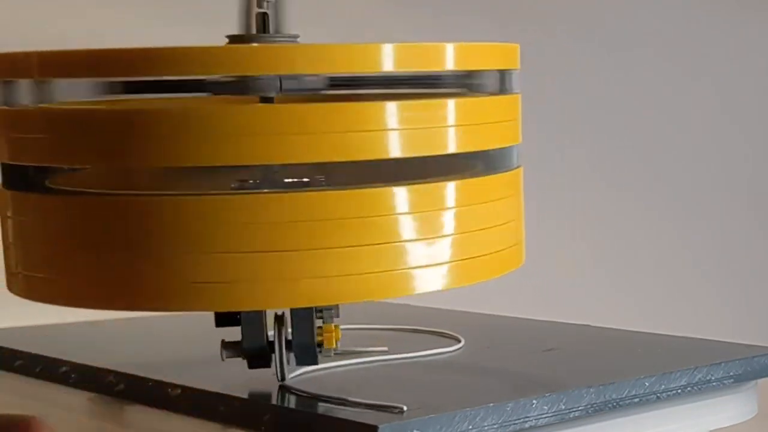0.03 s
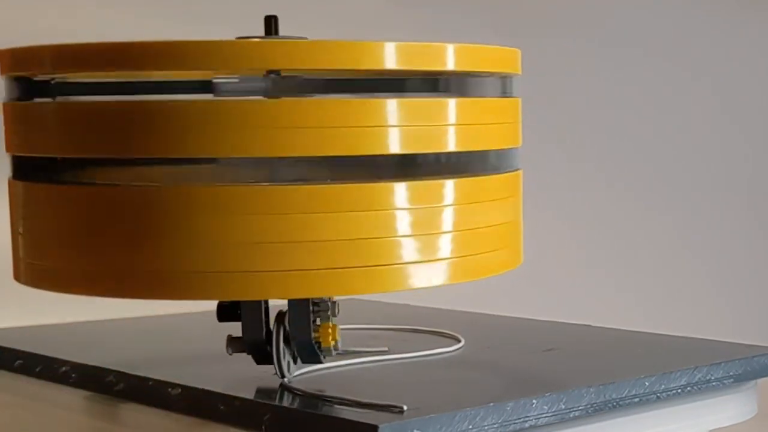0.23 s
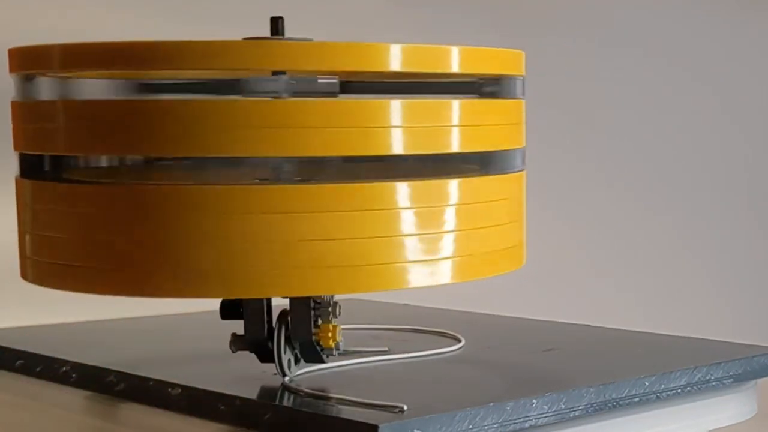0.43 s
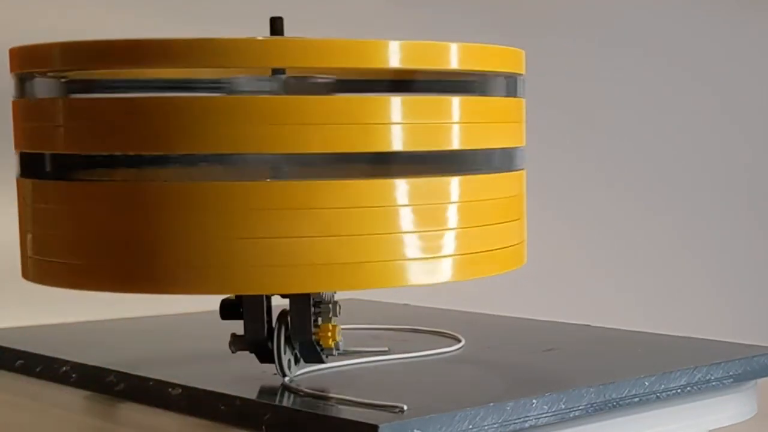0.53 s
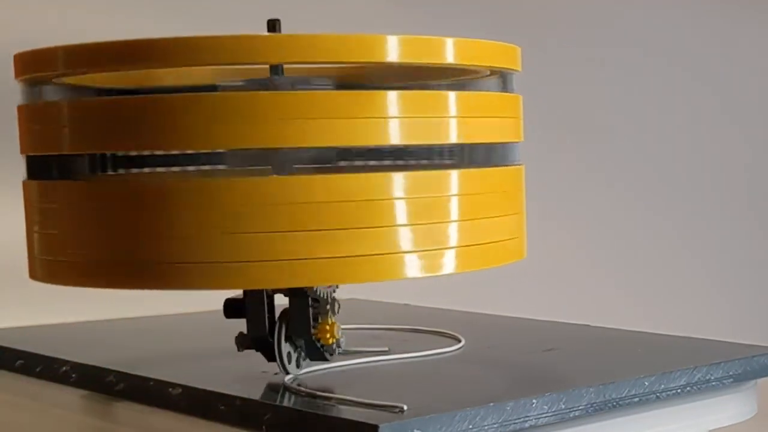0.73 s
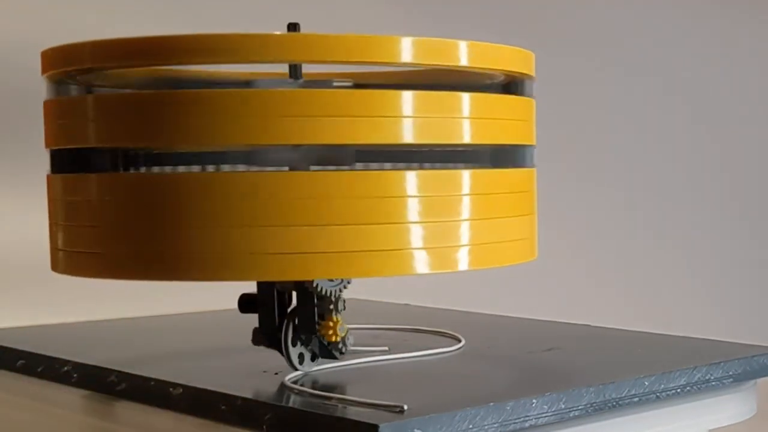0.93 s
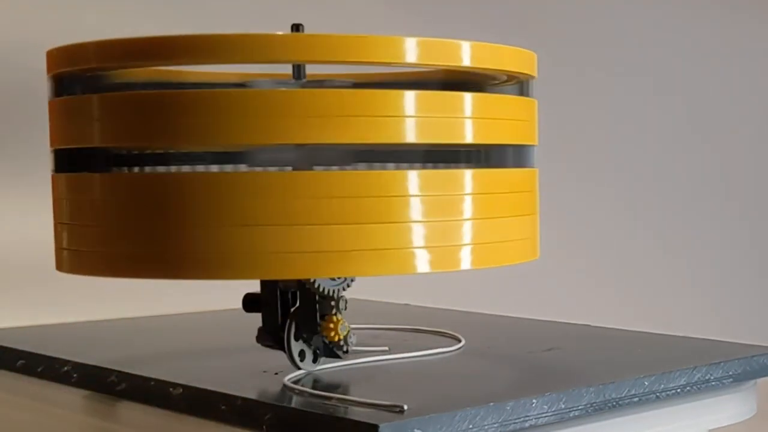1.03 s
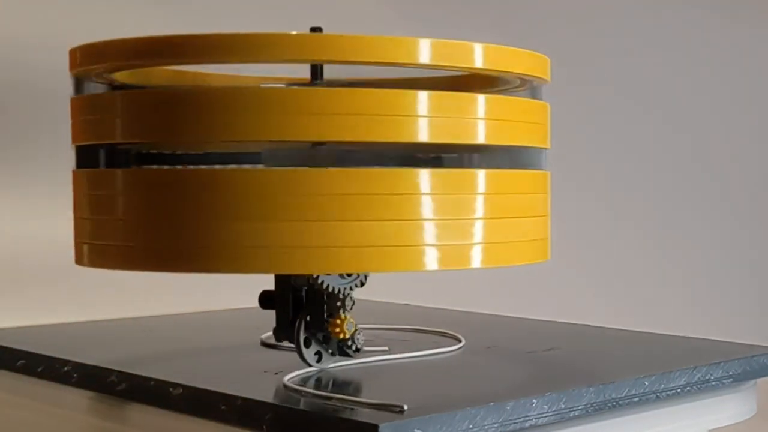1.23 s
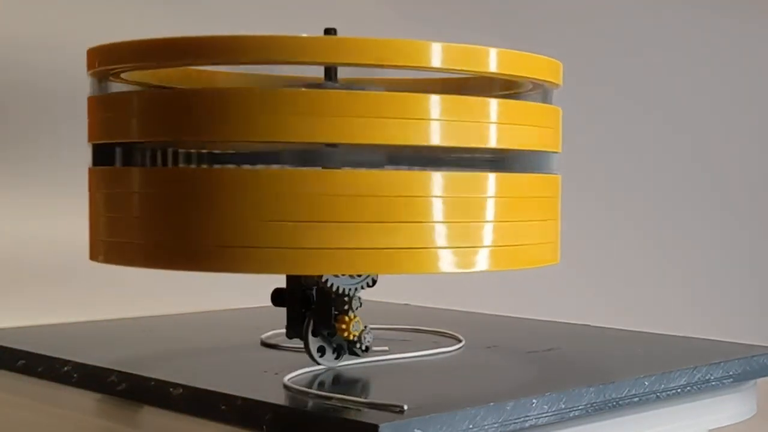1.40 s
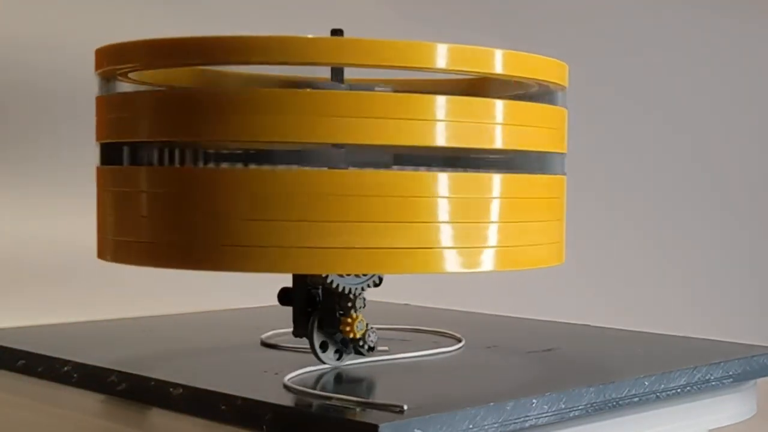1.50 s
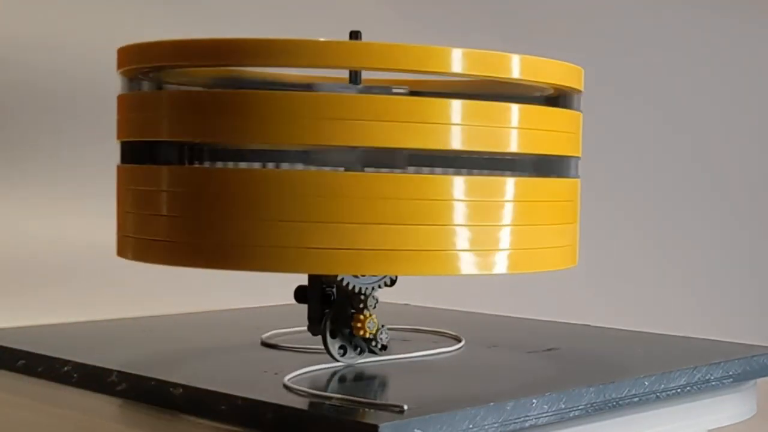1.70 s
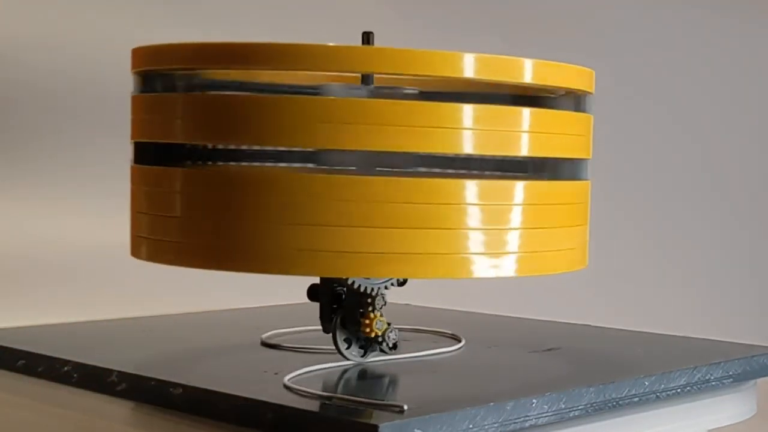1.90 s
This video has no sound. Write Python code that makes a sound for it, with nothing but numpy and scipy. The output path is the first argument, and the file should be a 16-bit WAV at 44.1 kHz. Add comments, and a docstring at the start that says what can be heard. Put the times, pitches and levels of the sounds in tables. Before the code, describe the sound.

Noisy geared whirring of a spinning toy starts abruptly with plastic clacks, rattles along, and fades out

```python
"""Small room, close pair of microphones: a toy gyroscope a little to the left runs on a board.
It hums on its spindle (wavering sines), is let go with a plastic clack (short noise bursts) and runs on its geared foot.
The gear teeth chatter (random impacts ringing the frame), catch in short rattles and run down.
The foot scrapes (sinking noise band) and bumps the board (decaying sines and thuds); the flywheel rumbles."""
import sys
import numpy as np
from scipy import signal
from scipy.fft import rfft, irfft
from scipy.io import wavfile
from scipy.ndimage import map_coordinates

SR = 44100
rng = np.random.default_rng(int(sys.argv[2]) if len(sys.argv) > 2 else 0)


def wav_record(signal):
    """Record a signal, one row per channel, as 16-bit PCM in the file named by sys.argv[1]."""
    frames = np.transpose(np.atleast_2d(signal))
    bounded = np.clip(frames, -1, 1)
    # unit amplitude maps onto the largest positive 16-bit level
    quanta = np.round(bounded * 32767).astype(np.int16)
    wavfile.write(sys.argv[1], SR, quanta)


N = 85995
TIME_S = np.arange(N) / SR
# Table levels are relative to the mix in scene().


def amp(db):
    """Decibels to gain."""
    return 10 ** (np.asarray(db) / 20)


def evened(x):
    """Scales to an rms of 1."""
    return x / np.sqrt(np.mean(x ** 2) + 1e-20)


def unit(x):
    """Scales to an energy of 1."""
    return x / np.sqrt(np.sum(x ** 2) + 1e-20)


def curve(rows):
    """Columns of a time table, interpolated to one value per sample."""
    knot_s, *columns = np.transpose(rows)
    return [np.interp(TIME_S, knot_s, column) for column in columns]


def read(points, freq_hz):
    """Spectrum table interpolated on a log-frequency axis."""
    knot_hz, value = np.transpose(points)
    return np.interp(np.log(freq_hz + 1), np.log(knot_hz + 1), value)


def add(mix, start_s, sound):
    """Mixes a sound in at a time."""
    part = mix[max(round(start_s * SR), 0):][:len(sound)]
    part += sound[:len(part)]


def through(x, response):
    """Convolves and keeps the length."""
    return signal.fftconvolve(x, response)[:len(x)]


def colour(points, size=4096):
    """Causal (minimum-phase) response with the given spectrum."""
    freq_hz = abs(np.fft.fftfreq(size, 1 / SR))
    log_gain = np.log(amp(read(points, freq_hz)))
    spectrum = np.exp(np.conj(signal.hilbert(log_gain)))
    return np.fft.ifft(spectrum).real[:size // 2]


def ring(modes, size=12000):
    """Struck object: a sum of exponentially dying sines, scaled to unit energy."""
    t_s = np.arange(size) / SR
    partials = (amp(level_db) * 1000 ** (-t_s / t60_s) * np.sin(2 * np.pi * pitch_hz * t_s)
                for pitch_hz, level_db, t60_s in modes)
    return unit(sum(partials))


def drift(rate_hz):
    """Slow random curve of rms 1: noise rolled off above a rate."""
    rolloff = 1 + (np.fft.rfftfreq(N, 1 / SR) / rate_hz) ** 4
    return evened(irfft(rfft(rng.standard_normal(N)) / rolloff, N))


def ticks(per_s, spread_db):
    """Random impacts of uneven size and either sign, rms 1."""
    size = amp(spread_db * np.minimum(rng.exponential(1, N), 3.5))
    sign = rng.choice([-1, 1], N)
    return evened(size * sign * (rng.random(N) < per_s / SR))


def resonate(x, centre_hz, width_hz):
    """Resonance that follows a frequency curve: shift to zero, lowpass, shift back."""
    turn = np.exp(2j * np.pi * np.cumsum(centre_hz) / SR)
    pole = np.exp(-np.pi * width_hz / SR)
    return 2 * (turn * signal.lfilter([1 - pole], [1, -pole], x / turn)).real


def scatter(t60_s, size=6000):
    """Dense, quickly dying cluster of contacts or echoes, unit energy."""
    return unit(rng.standard_normal(size) * 1000 ** (-np.arange(size) / SR / t60_s))


def turning(x, responses, swap_hz):
    """Crossfades round a cycle of responses, because the toy keeps turning."""
    count = len(responses)
    away = (TIME_S * swap_hz - np.arange(count)[:, None] + 1) % count - 1  # swaps from each response's peak
    gains = np.cos(np.pi / 2 * np.clip(away, -1, 1))
    return sum(through(x * gain, response) for gain, response in zip(gains, responses))


# air of the room: freq_hz, density_db_per_hz
FLOOR_COLOUR = [(20, -25), (32, -29), (48, 1.5), (110, -13), (220, -3), (450, -6), (900, -19), (1600, -9.5),
                (4000, -45), (8000, -29), (16000, -53)]
FLOOR_DB = -59


def room_tone(apart=0.51):
    """Quiet air of the room: coloured noise, partly shared by both microphones."""
    shared, left, right = (through(noise, colour(FLOOR_COLOUR)) for noise in rng.standard_normal((3, N)))
    return amp(FLOOR_DB) * evened(shared + apart * np.array([left, right]))


# hum of the held wheel: pitch_hz, level_db
HUM_TONES = [(89, -55.5), (244, -51.5), (522, -59)]
HUM_END_S, HUM_FADE_S = 0.31, 0.13  # the fade starts at the end time


def hum(flutter_db=1.5, whine_hz=1550, whine_width_hz=70, whine_db=-63):
    """Wheel on its spindle: wavering sines and a faint whine until shortly after it is let go."""
    held = np.clip(1 - (TIME_S - HUM_END_S) / HUM_FADE_S, 0, 1)
    warped_s = np.cumsum(1 + .005 * drift(rate_hz=14)) / SR  # pitch wavers by 0.5 % rms
    whine = evened(resonate(rng.standard_normal(N), np.full(N, whine_hz), whine_width_hz))
    tones = sum(amp(level_db + flutter_db * drift(rate_hz=28)) * np.sin(2 * np.pi * pitch_hz * warped_s)
                for pitch_hz, level_db in HUM_TONES)
    return held * (tones + amp(whine_db) * whine)


# modes of the plastic frame: pitch_hz, level_db, t60_s
FRAME_MODES = [(2460, -17.5, 0.023), (3215, -0.5, 0.009), (5170, 1, 0.014), (7086, 0, 0.021),
               (9130, -3.5, 0.017), (11140, -1.5, 0.012), (12900, -1, 0.0059), (15100, -8, 0.0062)]


def frame(x, count=12):
    """Plastic frame: its modes ring at slightly different pitches as the toy turns."""
    shifts = 1 + .012 * rng.standard_normal((count, len(FRAME_MODES)))
    rings = []
    for row in shifts:
        modes = [(pitch_hz * k, level_db, t60_s) for (pitch_hz, level_db, t60_s), k in zip(FRAME_MODES, row)]
        rings.append(ring(modes, size=2000))
    return turning(x, rings, swap_hz=69.5)


# gear chatter: time_s, whirr_db, teeth_db
GEAR_LEVELS = [(0, -56, -52.5), (.216, -56, -56), (.236, -37, -34), (.29, -40, -36.5), (.33, -39.5, -39),
               (.41, -40.5, -36.5), (.52, -41.5, -43.5), (.66, -41.5, -40.5), (.8, -40.5, -39.5),
               (.93, -41.5, -39.5), (1.02, -41, -35), (1.1, -41.5, -37.5), (1.21, -40.5, -40),
               (1.46, -44.5, -43), (1.515, -48, -47), (1.66, -49.5, -53), (1.8, -62, -62),
               (1.95, -64.5, -73)]
# whirr: freq_hz, density_db_per_hz
WHIRR_COLOUR = [(100, -35), (300, -9), (750, -12.5), (1400, -8.5), (2300, -5.5), (3200, -2), (4200, -9.5),
                (7000, -5.5), (16000, -59)]
# tooth ticks, also in rattles(): freq_hz, density_db_per_hz
TEETH_COLOUR = [(500, -46), (2000, -9), (3300, -6), (4500, -0.5), (6700, 1.5), (8000, -2), (10000, -3),
                (12000, -6), (16000, -9.5)]
# middle of the whirr, sinking as the gears slow: time_s, centre_hz
WHIRR_CENTRE = [(.5, 2400), (1.1, 2230), (1.5, 1760)]


def gears(flutter_db=1.0, flutter_hz=220, sink_db=-7, ring_db=-7, sharp_db=-6, dull_hz=7500, bright_db=-42):
    """Teeth strike thousands of times a second, a few sharply, and ring the frame; soft strikes are duller."""
    whirr_db, teeth_db = curve(GEAR_LEVELS)
    clumps = amp(flutter_db * drift(flutter_hz))
    mesh, rub, fine = (clumps * ticks(per_s=12000, spread_db=3) for _ in range(3))
    sinking = evened(resonate(rub, curve(WHIRR_CENTRE)[0], width_hz=670))
    whirr = evened(through(mesh, colour(WHIRR_COLOUR))) + amp(sink_db) * sinking
    strikes = fine + amp(sharp_db) * ticks(per_s=120, spread_db=1.0)
    struck = evened(through(strikes, colour(TEETH_COLOUR)))
    teeth = evened(struck + amp(ring_db) * evened(frame(rub)))
    dull = signal.filtfilt(*signal.butter(1, dull_hz, fs=SR), teeth)
    force = np.minimum(amp(.5 * (teeth_db - bright_db)), 1)  # 1 = full treble, at bright_db and above
    return amp(whirr_db) * evened(whirr) + amp(teeth_db) * (dull + force * (teeth - dull))


# flywheel rumble: time_s, level_db
SPIN_LEVEL = [(0, -51), (.2, -51), (.3, -49.5), (.42, -56.5), (.85, -56.5), (1.07, -55), (1.25, -64),
              (1.55, -60), (1.95, -64)]
# its spectrum: freq_hz, density_db_per_hz
SPIN_SPECTRUM = [(25, -20), (60, -27), (90, 3), (150, -1.5), (240, 7), (340, -4), (480, -8), (750, -10.5),
                 (1500, -13.5), (4000, -31)]


def flywheel():
    """Spinning wheel's bearing rumbles through the board: uneven impacts, coloured."""
    rumble = through(ticks(per_s=1500, spread_db=8.0), colour(SPIN_SPECTRUM))
    return amp(curve(SPIN_LEVEL)[0]) * evened(rumble)


# bumps on the board: start_s, thud_db, knock_db, knock_hz, ring_db
BUMP_EVENTS = [(.008, -24, -17.5, 132, -33), (0.268, -17, -14, 270, -26), (0.28, -17.5, -21, 235, -28),
               (0.299, -19, -16, 130, -30), (.497, -22, -24, 270, -18.5), (.682, -42, -14.5, 800, -40),
               (.691, -34, -18, 493, -28), (.714, -38, -20, 676, -33), (1.043, -38, -23, 288, -42),
               (1.636, -31, -15.5, 540, -30), (1.6447, -18.5, -16, 456, -16.5)]
# thud: freq_hz, density_db_per_hz
THUD_COLOUR = [(40, -34), (80, 6), (220, -14), (500, 4), (1200, 5.5), (3000, -16), (16000, -59)]
# modes of the knock: multiple_of_knock_hz, level_db, t60_s
KNOCK_MODES = [(1, 0.5, 0.019), (1.3, -6, 0.017), (2.5, -8, 0.016)]
# modes of the board: pitch_hz, level_db, t60_s
BOARD_MODES = [(467, -0.82, 0.28), (1378, 6, 0.19), (1270, -2, .13), (1200, -2, 0.017)]


def bumps():
    """Foot on board: a short woody knock, a dull noise thud and a faint ring of the board."""
    out = np.zeros(N)
    for start_s, thud_db, knock_db, knock_hz, ring_db in BUMP_EVENTS:
        knock = ring([(knock_hz * multiple, level_db, t60_s) for multiple, level_db, t60_s in KNOCK_MODES])
        thud = unit(through(scatter(t60_s=0.069), colour(THUD_COLOUR)))
        add(out, start_s, amp(knock_db) * knock)
        add(out, start_s, amp(thud_db) * thud)
        add(out, start_s, amp(ring_db) * ring(BOARD_MODES))
    return out


SCRAPE_S, SCRAPE_HZ, SCRAPE_SAG_HZ_PER_S = 0.22, 3374, 520
SCRAPE_DB, SCRAPE_FADE_DB_PER_S = -42.5, 18


def scrape(width_hz=720):
    """Landing foot scrapes in one noise band, which sinks and fades as the foot takes up the spin."""
    age_s = np.maximum(TIME_S - SCRAPE_S, 0)
    centre_hz = SCRAPE_HZ - SCRAPE_SAG_HZ_PER_S * age_s
    once = resonate(rng.standard_normal(N), centre_hz, width_hz)
    band = resonate(once, centre_hz, width_hz)
    return (age_s > 0) * amp(SCRAPE_DB - SCRAPE_FADE_DB_PER_S * age_s) * evened(band)


# clacks of release and landing, then dry clicks of running and settling: start_s, level_db
CLACK_EVENTS = [(.2277, -11.5), (.2333, -20), (.2367, -4), (.2380, 0), (.2395, -4), (0.2485, -11),
                (0.2575, -4), (.287, -8), (.463, -14), (.9893, -9), (1.0752, -18), (1.719, -37),
                (1.771, -44), (1.7923, -28)]
# their spectrum: freq_hz, level_db
CLACK_SPECTRUM = [(200, -11), (1200, -11), (2200, -13), (3400, 8), (4500, -1.5), (7000, 2), (11000, -3),
                  (16000, -11)]


def clacks(ring_db=-11):
    """Hard, dry blows of plastic on plastic: short noise bursts that also ring the frame."""
    drive = np.zeros(N)
    for start_s, level_db in CLACK_EVENTS:
        add(drive, start_s, amp(level_db) * scatter(t60_s=0.003))
    return through(drive, unit(colour(CLACK_SPECTRUM))) + amp(ring_db) * frame(drive)


# rattles where the teeth catch: start_s, length_s, level_db
RATTLE_EVENTS = [(0.341, 0.027, -9), (0.375, 0.0057, -12), (0.393, 0.0037, -11.5), (0.4446, 0.021, -8.5),
                 (0.492, 0.012, -10), (0.537, 0.011, -6.5), (0.5963, 0.002, -11), (0.637, 0.003, -13),
                 (0.685, 0.025, -8), (0.748, 0.0087, -13.5), (0.813, 0.011, -13), (0.876, 0.0048, -11),
                 (0.979, 0.0081, -10.5), (1.012, 0.012, -11.5), (1.066, 0.023, -4.5),
                 (1.096, 0.0027, -12.5), (1.111, 0.0042, -5.5), (1.3674, 0.0046, -13),
                 (1.451, 0.019, -11.5), (1.5565, 0.01, -25), (1.594, 0.0048, -23), (1.624, 0.0022, -26)]


def rattles(ring_db=-2.0, crack_db=-1, fade_db=-5, hard_hz=19000, softening=0.28):
    """A catching tooth buzzes against the frame and dies away; gentle catches are duller."""
    drive = np.zeros(N)
    contacts = ticks(per_s=7700, spread_db=-1.0)
    for start_s, length_s, level_db in RATTLE_EVENTS:
        buzz = contacts[round(start_s * SR):][:max(round(length_s * SR), 2)]
        buzz = unit(buzz * amp(np.linspace(0, fade_db, len(buzz))))
        top_hz = min(hard_hz * amp(softening * level_db), SR / 2 - 1)  # hard_hz holds at 0 dB
        add(drive, start_s, amp(level_db) * signal.lfilter(*signal.butter(2, top_hz, fs=SR), buzz))
    return amp(ring_db) * frame(drive) + amp(crack_db) * through(drive, unit(colour(TEETH_COLOUR)))


# reverberation: freq_hz, t60_s
ROOM_DECAY = [(100, 0.22), (500, 0.45), (2000, 0.23), (6000, 0.28), (16000, 0.18)]


def echo(near_db=-3, near_t60_s=0.026, tail_db=-5, low_hz=450):
    """Random response: quick reflections from board and wheel, then the room's tail, bass cut."""
    freq_hz, t_s, bins = signal.stft(rng.standard_normal(SR // 2), SR, nperseg=256)
    decay = 1000 ** (-t_s / read(ROOM_DECAY, freq_hz)[:, None])
    tail = unit(signal.istft(bins * decay, SR, nperseg=256)[1])
    response = np.zeros(SR // 2)
    add(response, .0007, amp(near_db) * scatter(near_t60_s))
    add(response, .006, amp(tail_db) * tail)
    return signal.lfilter(*signal.butter(2, low_hz, "high", fs=SR), response)


def echoes(x, count=13):
    """Reflections shift as the toy turns and travels: a cycle of random echo responses."""
    return turning(x, [echo() for _ in range(count)], swap_hz=110.25)


# toy's position: time_s, left_lead_ms, right_level_db
TOY_PLACE = [(0, 0.22, 2), (.28, 0.2, 0), (.6, 0.25, 0), (.9, 0.35, -0.5), (1.06, 0.445, -2),
             (1.25, 0.44, -0.5)]
# direct sound, right microphone against left: freq_hz, level_db
RIGHT_SHADE = [(100, -1), (500, 0), (1500, -0.5), (3200, -6.5), (6500, -7), (9000, -7.5), (16000, 2)]
# echoes at the right microphone: freq_hz, level_db
RIGHT_ECHO_COLOUR = [(100, -9.5), (2000, 0), (6500, -1.5), (9500, -3.5), (16000, -20)]


def scene(direct_db=-3, board_echo_db=-3):
    """Toy direct, later and duller on the right, plus its room echoes; the board's echoes stay put."""
    high = gears() + scrape() + rattles() + clacks()
    low = bumps() + flywheel() + hum()
    left_lead_ms, right_db = curve(TOY_PLACE)
    high_right = amp(right_db) * high
    left, right = high + low, high_right + low
    late = map_coordinates(right, [np.arange(N) - left_lead_ms * SR / 1000], order=3)
    direct = np.array([left, through(late, colour(RIGHT_SHADE))])
    wet_left, wet_right = (echoes(toy) + amp(board_echo_db) * through(low, echo())
                           for toy in (high, high_right))
    wet = np.array([wet_left, through(wet_right, colour(RIGHT_ECHO_COLOUR))])
    return amp(direct_db) * direct + wet + room_tone()


EDGE_HZ = 15850


def record(dry, low_hz=38):
    """Bass cut and steep treble limit on both channels."""
    thinned = signal.lfilter(*signal.butter(2, low_hz, "high", fs=SR), dry)
    band_limit = signal.firwin(511, EDGE_HZ, window=("kaiser", 9), fs=SR)
    return signal.oaconvolve(thinned, band_limit[None], "same")


dry = scene()
out = record(dry)
wav_record(out)
```